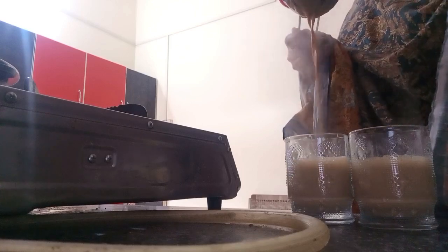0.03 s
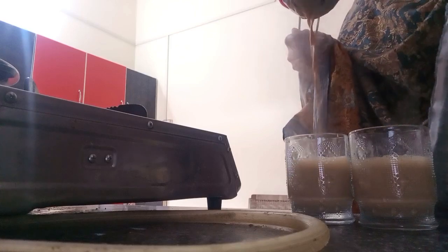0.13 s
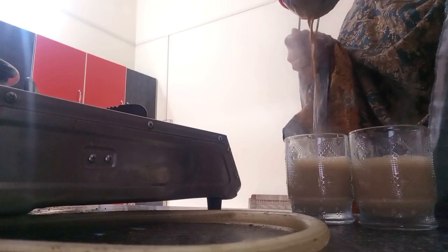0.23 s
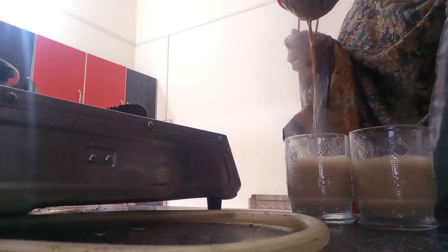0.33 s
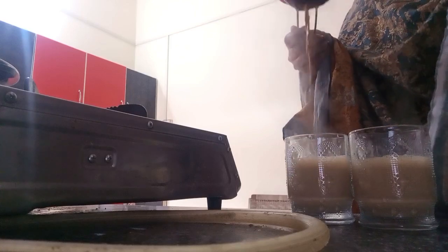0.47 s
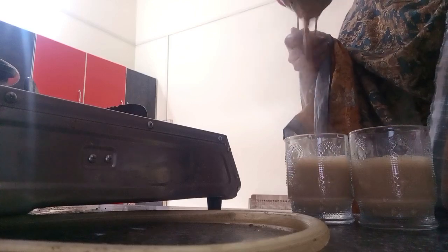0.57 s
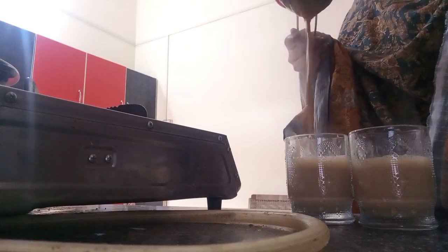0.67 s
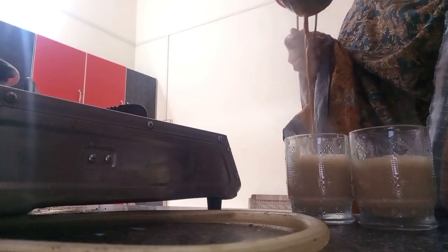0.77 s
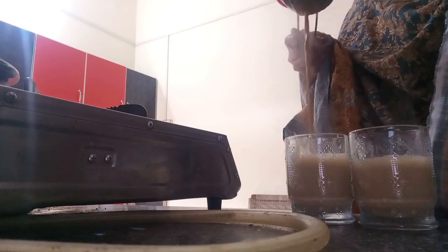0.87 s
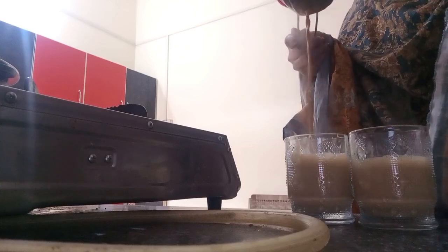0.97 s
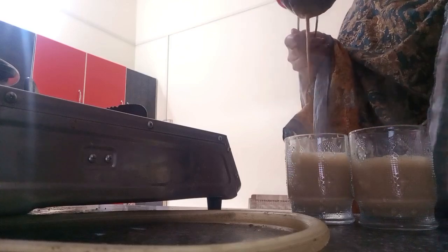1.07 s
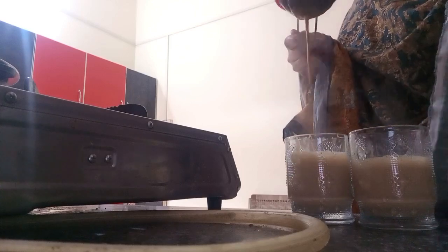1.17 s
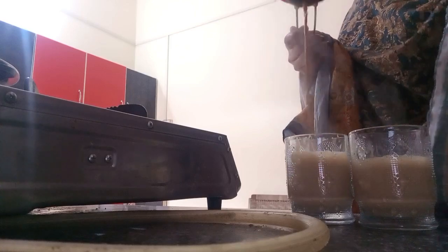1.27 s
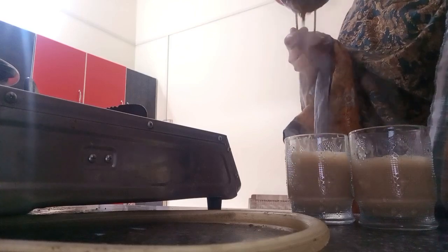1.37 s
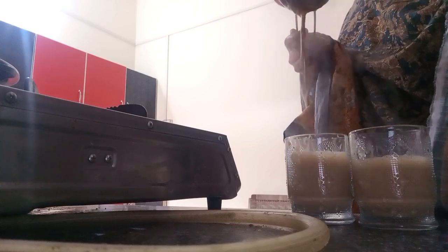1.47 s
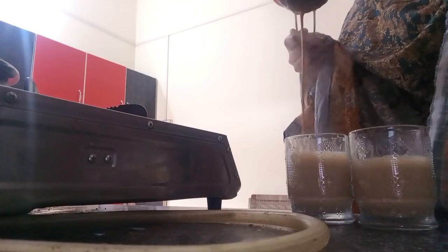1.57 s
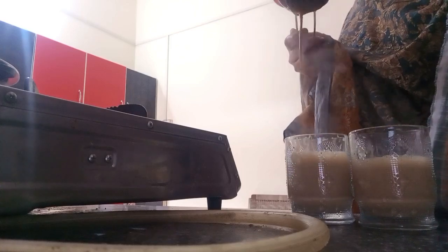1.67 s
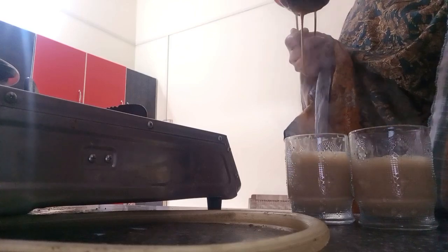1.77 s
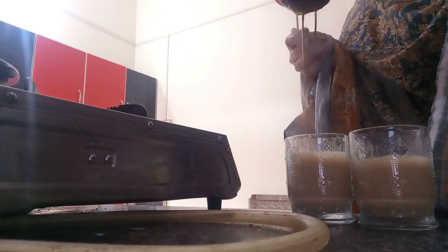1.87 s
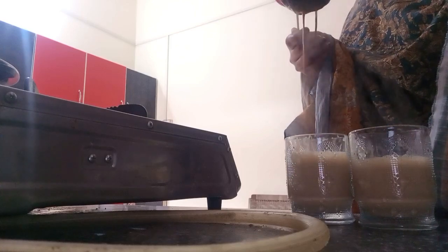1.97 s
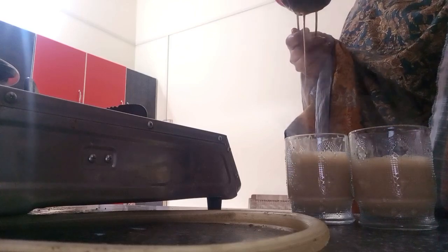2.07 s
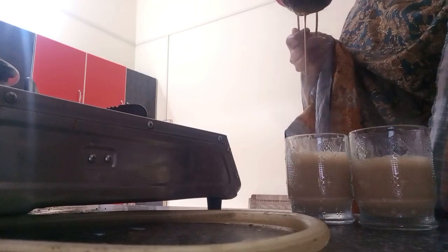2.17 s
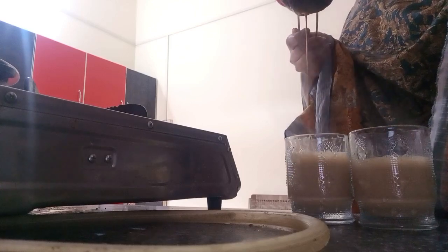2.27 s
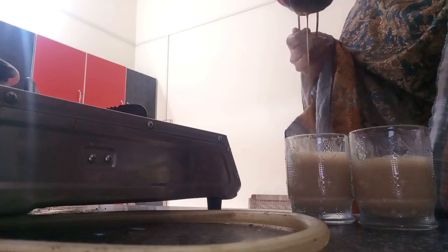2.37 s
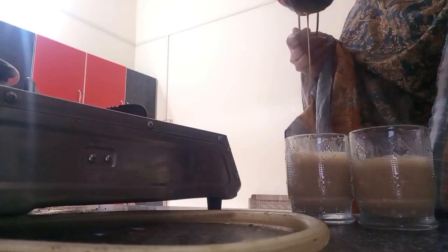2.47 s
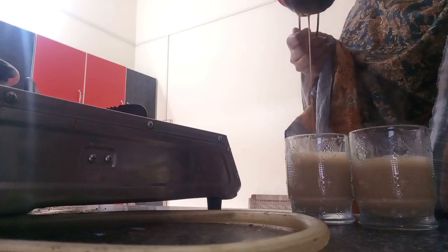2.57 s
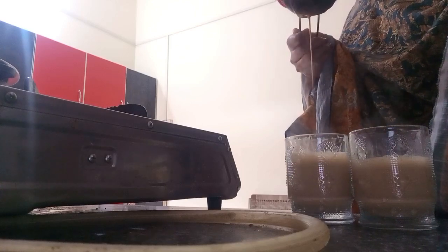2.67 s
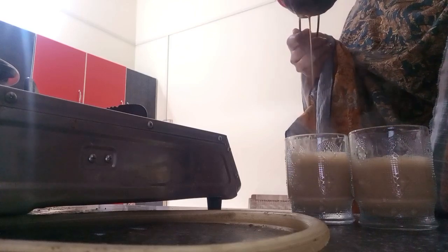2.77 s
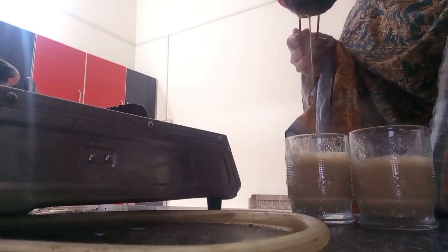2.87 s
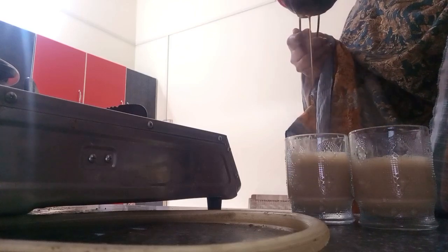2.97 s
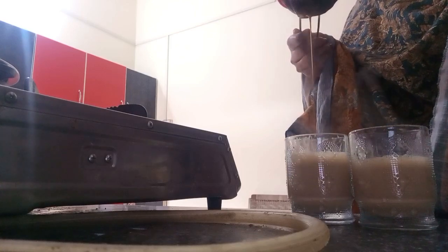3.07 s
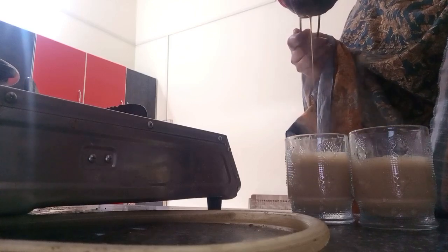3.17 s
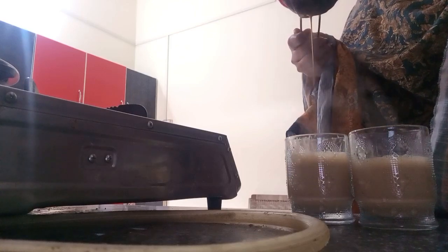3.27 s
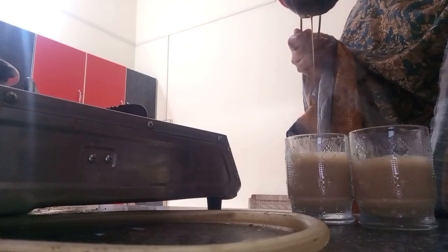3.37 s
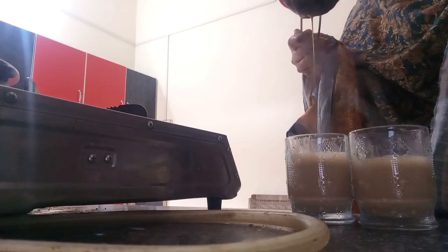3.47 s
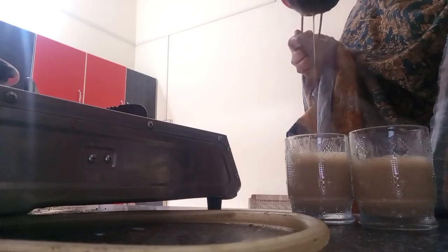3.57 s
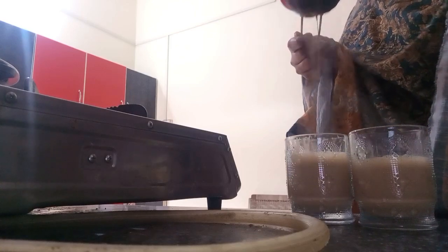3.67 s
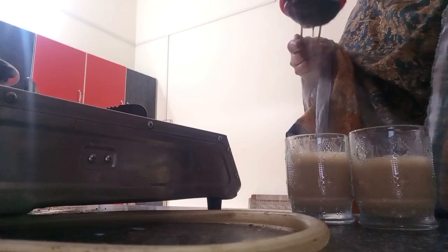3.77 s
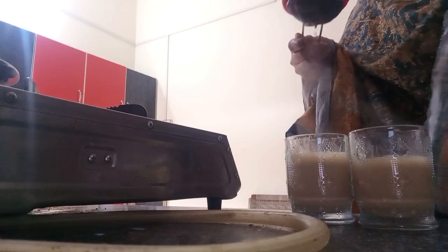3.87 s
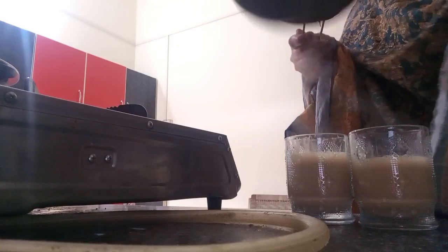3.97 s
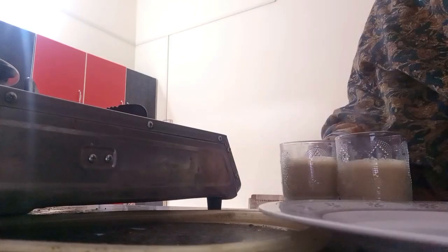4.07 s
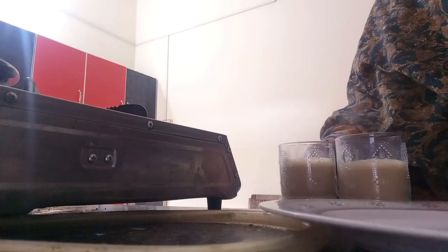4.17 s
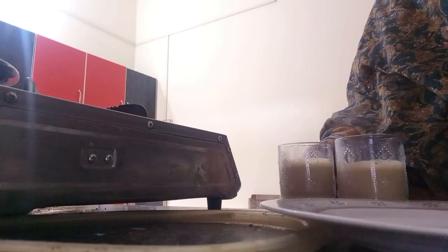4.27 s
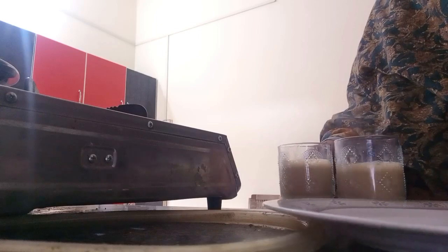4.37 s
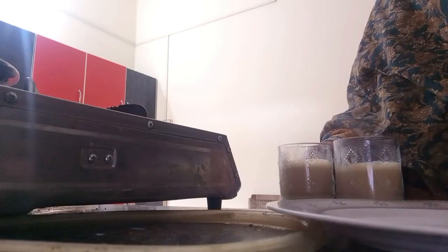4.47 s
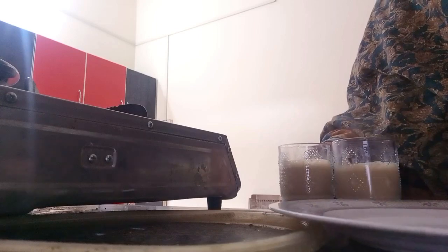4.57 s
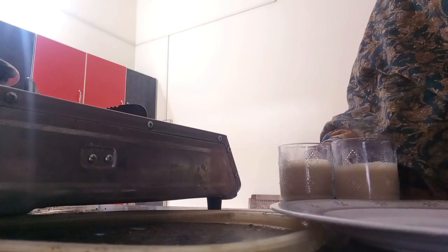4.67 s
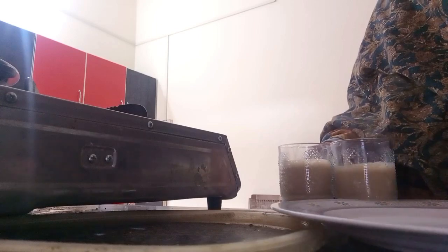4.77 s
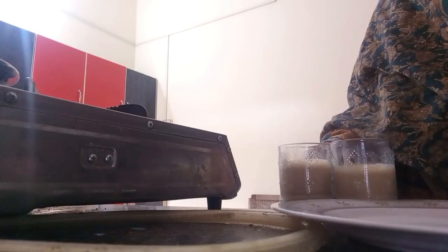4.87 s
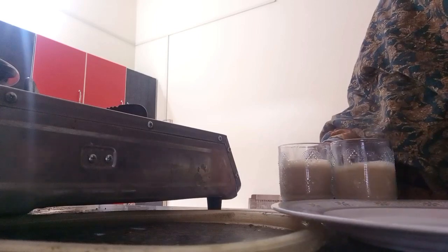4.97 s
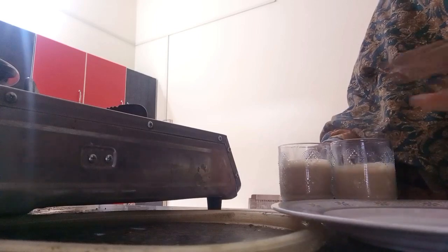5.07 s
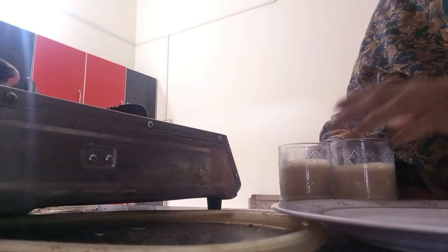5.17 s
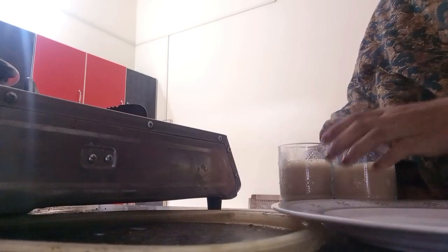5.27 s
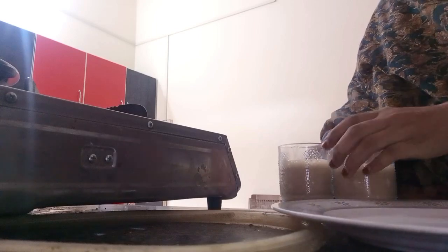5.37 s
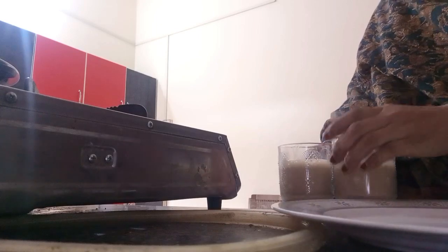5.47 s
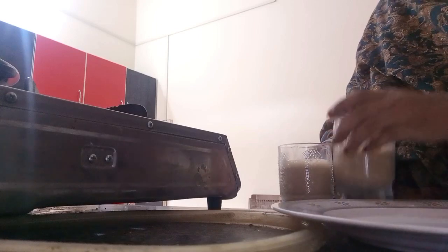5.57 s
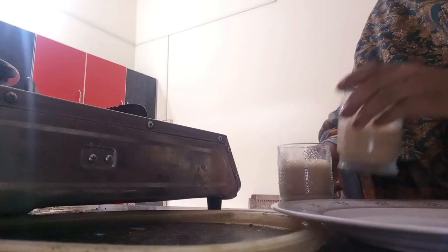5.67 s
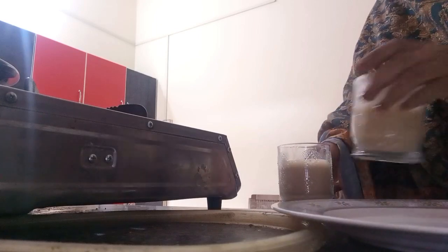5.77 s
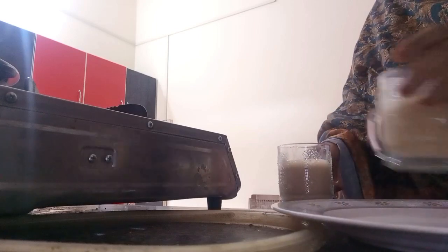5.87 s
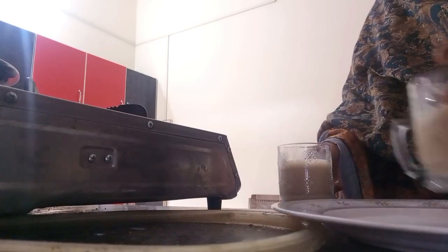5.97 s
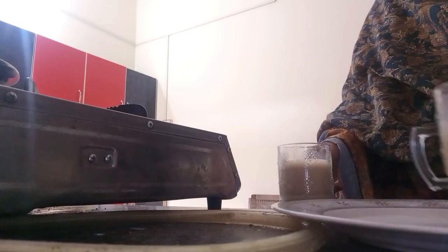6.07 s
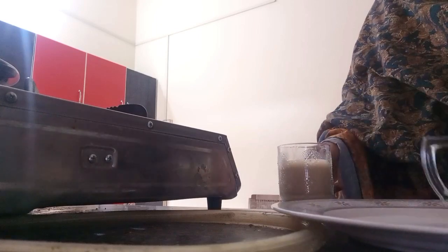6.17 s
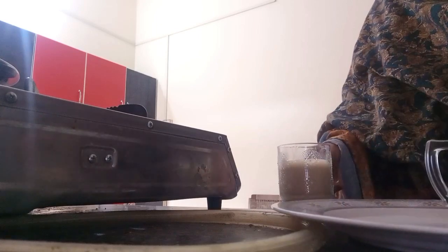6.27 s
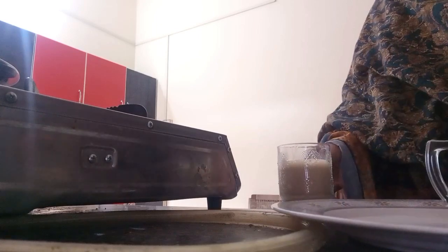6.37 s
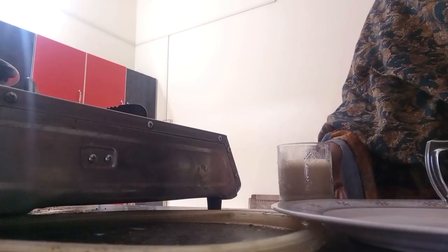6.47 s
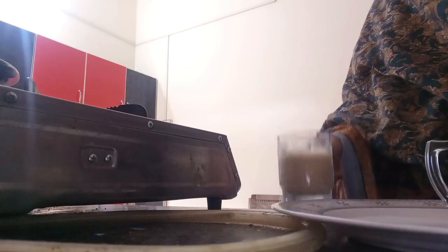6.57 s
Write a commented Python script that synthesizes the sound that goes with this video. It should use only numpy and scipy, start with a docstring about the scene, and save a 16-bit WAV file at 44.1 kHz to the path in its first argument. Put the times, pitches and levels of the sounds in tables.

```python
"""Hot tea trickles through a strainer into a glass tumbler, close to the microphone: rising bubble tones,
puffs of droplet noise, low glugs and a soft bed of gurgle, fizz and slosh. The pan taps the strainer twice.
After a very brief silence a plate slides along the counter as resonant friction noise. Glasses clink, and
one is set down with a sharp knock; these blows are noise bursts with dying tones. Room echo, air, a low
rumble and a thin whine lie around it all."""
import sys
import numpy as np
from scipy import signal
from scipy.fft import rfft, irfft
from scipy.io import wavfile
from scipy.ndimage import uniform_filter1d

SR = 44100
rng = np.random.default_rng(int(sys.argv[2]) if len(sys.argv) > 2 else 0)


def store_wav(level_fs):
    """Save 16-bit WAV to argv[1]."""
    pcm = np.round(np.clip(np.atleast_2d(level_fs), -1, 1) * 32767)
    wavfile.write(sys.argv[1], SR, pcm.T.astype(np.int16))


N = 291501
T = np.arange(N) / SR  # time in seconds

# In all tables, fade time means the time to die away by 60 dB.
# Room air noise. Each row: frequency in Hz, relative level in dB.
AIR_SPECTRUM = [(25, -31.5), (87, -19.5), (180, -15.5), (270, 9), (480, -14), (800, -20), (2100, -16),
                (6300, -25), (8000, -32.5), (16200, -21.5)]
# Low rumble of the house. Each row: time in seconds, level in dB.
RUMBLE_LEVEL = [(0, -68), (2.0, -67.5), (4.0, -68), (5.0, -65.5), (5.3, -70), (5.8, -63.5), (6.61, -64)]
# Swells of the thin whine. Each row: middle in seconds, length in seconds, lift in dB.
WHINE_SWELLS = [(2.294, 0.22, 9.5), (2.973, 0.16, 15), (5.5, 0.43, 11.5)]
# Echo of the tiled room. Each row: frequency in Hz, fade time in seconds.
ROOM_FADE = [(250, 1), (1000, 0.81), (3000, 0.63), (6000, 0.54), (12000, 0.22)]
# Plate sliding on the counter. Each row: time in seconds, speed from 0 to 1.
SLIDE_SPEED = [(4.026, 0.41), (4.2, 0.44), (4.3, 0.61), (4.48, 0.8), (4.77, 0.57), (4.826, 0.57)]
# Plate resonances. Each row: frequency in Hz, width in Hz, lift in dB before it wanders.
PLATE_RESONANCES = [(1130, 84, 19.5), (1797, 68, 24), (2080, 54, 19), (2660, 113, 17.5), (3340, 130, 16),
                    (3860, 25, 17), (4570, 85, 15.5), (4820, 110, 17), (5360, 140, 13), (5720, 64, 22.5),
                    (7120, 270, 23.5), (8600, 160, 24.5), (9900, 150, 17)]
# Dull friction noise. Each row: frequency in Hz, relative level in dB.
DULL_RUB_SPECTRUM = [(100, -18), (270, 3.5), (950, -1), (2600, -11), (5500, -29), (16000, -26)]
# Bright friction noise. Each row: frequency in Hz, relative level in dB.
BRIGHT_RUB_SPECTRUM = [(100, -53), (300, 6.5), (1100, -9), (1500, -13), (2700, -2), (6000, -10),
                       (8000, -29.5), (16000, -26)]
# Small shifts as the plate settles. Each row: middle in seconds, length in seconds, peak level in dB,
# brightness from 0 to 1.
PLATE_NUDGES = [(4.779, 0.034, -56, 1), (4.853, 0.068, -45, 0.15), (4.936, 0.066, -53.5, 0.9),
                (4.975, 0.046, -50, 1), (5.067, 0.37, -66.5, 0.86)]
# The plate meets a glass, then settles. Each row: start in seconds, level in dB, relative ring level in dB.
PLATE_HITS = [(4.827, -23, -15.5), (4.831, -23.5, -18.5), (5.002, -38, -12)]
# Tones of the struck plate. Each row: frequency in Hz, relative level in dB, fade time in seconds.
PLATE_TONES = [(135, -11, 0.19), (540, -15, 0.16), (965, -21.5, 0.11), (2430, -5.5, 0.21),
               (2630, -2, 0.074), (6200, -8, 0.11), (6830, -16, 0.064)]
# Dull bumps on the counter. Each row: start in seconds, level in dB, pitch in Hz, fade time in seconds.
COUNTER_BUMPS = [(4.049, -41.5, 600, 0.072), (4.262, -32, 1096, 0.032), (4.399, -44.5, 458, 0.078),
                 (5.002, -39, 311, 0.097), (5.25, -59.5, 1370, 0.067), (5.406, -49, 457, 0.13),
                 (5.95, -48.5, 260, .12), (6.233, -49.5, 322, 0.17)]
# A tumbler rocks on its base. Each row: start in seconds, level in dB.
TUMBLER_ROCKS = [(5.445, -30.5), (5.464, -31.5)]
# Tones of the tumbler's base. Each row: frequency in Hz, relative level in dB, fade time in seconds.
BASE_TONES = [(380, -5, .2), (629, -2.5, 0.22), (845, -13, .15), (1016, 2.5, 0.11), (1739, -13, .08)]
# Glasses touching. Each row: start in seconds, level in dB, relative ring level in dB.
GLASS_CLINKS = [(5.599, -30, -19), (5.603, -32, -22), (5.618, -33, -22), (5.6635, -12, -18)]
# Tones of a tumbler. Each row: frequency in Hz, relative level in dB, fade time in seconds.
GLASS_TONES = [(921, -9, .28), (1270, -18, .3), (1567, -12, .3), (2379, 0, .36), (2527, -8, .4),
               (6853, -21, .22), (10880, -17, .2)]
# Noise of a blow on glass. Each row: frequency in Hz, relative level in dB.
GLASS_BLOW_SPECTRUM = [(90, -44.5), (200, -2.5), (900, 6), (2300, 3.5), (3300, -9), (8000, -35.5),
                       (16000, -31)]
# A glass is set down hard. Each row: start in seconds, level in dB.
GLASS_KNOCKS = [(6.288, 1)]
# Tones of the knocked counter. Each row: frequency in Hz, relative level in dB, fade time in seconds.
COUNTER_TONES = [(65.6, -35, 0.44), (659, -21.5, 0.62), (930, -16, 0.39), (1217, -15, 0.47),
                 (1493, -15.5, 0.53), (2030, -2.5, 0.066), (2784, 3, 0.019), (3990, 1.5, 0.02),
                 (4920, -1.5, 0.015), (5950, -5, 0.029), (7270, -10.5, 0.029)]
# Noise of the knock. Each row: frequency in Hz, relative level in dB.
KNOCK_SPECTRUM = [(30, -27), (500, -20), (850, -4.5), (1500, -5), (2200, -9.5), (3300, -17.5),
                  (6000, -20.5), (16000, -50)]
# The pan taps the strainer. Each row: start in seconds, level in dB.
PAN_TAPS = [(0.509, -15), (1.324, -13)]
# Tones of the pan. Each row: frequency in Hz, relative level in dB, fade time in seconds.
PAN_TONES = [(95.6, -17.5, 0.43), (871, -6, 0.38), (1281, -7.5, 0.41), (2256, -6.5, 0.16),
             (2676, -10, 0.16), (3550, -9.5, 0.15), (4380, -6.5, 0.13)]
# Noise of a pan tap. Each row: frequency in Hz, relative level in dB.
TAP_SPECTRUM = [(60, -31), (110, -11.5), (450, -3.5), (1300, 2), (3200, 11), (4500, 9.5), (7000, 4),
                (16000, -9.5)]
# Strength of the stream. Each row: time in seconds, strength in dB against full flow.
FLOW_STRENGTH = [(0, 2.5), (.8, -3.5), (1.2, -2), (1.8, -6), (2.2, -10), (2.6, -18.5), (3.3, -14.5),
                 (3.42, -26.5), (3.55, -20), (3.82, -26.5), (3.88, -42), (4.02, -22)]
# Larger bubbles caught by the stream. Each row: start in seconds, relative level in dB, basic pitch in Hz.
BUBBLES = [(0.035, -38, 1190), (0.064, -34.5, 1034), (0.112, -40, 1200), (0.134, -35, 1090),
           (0.279, -32.5, 1320), (0.303, -36.5, 1220), (0.372, -35.5, 976), (0.484, -29, 1280),
           (0.685, -29, 1020), (0.789, -39, 1220), (0.867, -37.5, 1120), (.912, -41.5, 1055),
           (1.001, -34, 1130), (1.06, -39.5, 1300), (1.203, -28, 1195), (1.23, -38, 1520),
           (1.296, -37.5, 990), (1.318, -32, 1250), (1.509, -35, 1080), (1.539, -34.5, 1310),
           (1.681, -24, 1093), (1.874, -37.5, 824), (1.977, -37.5, 960), (2.052, -42, 1280),
           (2.075, -33.5, 1035), (2.104, -39.5, 1720), (2.125, -32, 1070), (2.202, -35.5, 1330),
           (2.227, -37, 1230), (2.304, -26, 1240), (2.328, -33.5, 1680), (2.506, -41.5, 1240),
           (2.581, -44, 1360), (2.69, -42, 1040), (2.723, -43, 1284), (2.76, -39, 1305), (2.939, -43, 1170),
           (2.993, -39.5, 1310), (3.088, -50, 1280), (3.112, -33.5, 1694), (3.19, -46.5, 943),
           (3.278, -39.5, 1690), (3.317, -41, 1250), (3.351, -48.5, 1620), (3.496, -51, 1730),
           (3.573, -55, 1900), (3.741, -50.5, 900), (3.76, -53, 950), (3.8, -55.5, 1720), (3.891, -57, 895)]
# Larger droplets splashing on the surface. Each row: start in seconds, relative level in dB, centre in Hz.
SPLASHES = [(0.018, -37.5, 8850), (.079, -38, 9500), (.219, -41, 10500), (.377, -37, 9000),
            (.332, -34.5, 3700), (0.485, -38, 3280), (0.684, -31.5, 3440), (0.789, -38, 3350),
            (.833, -35, 9400), (1.538, -28.5, 1920), (0.896, -33, 5600), (1.11, -36.5, 4000),
            (1.193, -39.5, 6350), (1.517, -25, 8950), (1.682, -35.5, 7950), (1.747, -40, 3250),
            (1.781, -42.5, 3800), (1.927, -45, 4250), (1.965, -38, 8500), (1.995, -35.5, 2300),
            (2.009, -44, 9000), (2.504, -46, 3520), (2.625, -46, 3500), (2.842, -43.5, 3100),
            (2.990, -44, 3050), (3.19, -43.5, 2750), (3.242, -45, 7900), (3.35, -43.5, 3120),
            (3.65, -49, 2800), (3.693, -45, 2600), (3.799, -52.5, 3200)]
# Low glugs deep in the glass. Each row: start in seconds, level in dB, starting pitch in Hz,
# fade time in seconds.
GLUGS = [(0.833, -28, 297, 0.024), (0.974, -31, 260, 0.048), (1.001, -35.5, 337.7, 0.11),
         (1.098, -45, 293, 0.1), (1.161, -40, 351, 0.077), (3.265, -44.5, 293, 0.095),
         (3.479, -48, 264, 0.17)]
# Resonances of the air above the tea. Each row: frequency in Hz, width in Hz, gain in dB.
AIR_COLUMN = [(596, 920, 0.5), (973, 87, 2), (1273, 84, 7.5), (1500, 120, 9.5), (1960, 430, 12.5)]
# Upper resonances of the same air. Each row: frequency in Hz, width in Hz, lift in dB.
UPPER_AIR_COLUMN = [(3290, 90, -1), (3700, 170, -0.5)]
# Fizz of unseen droplets. Each row: frequency in Hz, relative level in dB.
FIZZ_SPECTRUM = [(1500, 1), (2500, 21), (3300, 18.5), (4200, 13.5), (6000, 15.5), (10000, 13.5), (16000, 5)]
# Colour of the microphone. Each row: frequency in Hz, gain in dB.
MIC_COLOUR = [(20, 5), (60, 1.5), (7000, -1), (9000, -9), (11000, -12.5), (13200, -23.5), (15300, -10)]

AIR_DB, WHINE_DB, WHINE_FADE_DB_PER_S = -64.5, -68, -2.5
WHINE_FROM_S, WHINE_RISE_S = 1.3, 0.25
RUB_FROM_S, RUB_TO_S = 4, 5.3  # the plate can rub only in this span
SLIDE_DB, SLOW_DB = -45, -7  # level at full speed, change towards rest
BRIGHTNESS_PER_SPEED = 1.34
RUB_WANDER_DB, RUB_WANDER_S = 4, .07
RUB_CATCH_DB, RUB_CATCH_S = 2, .012
TREBLE_SLOW_DB_PER_KHZ = -2.5
BUBBLE_START = 0.937  # a bubble starts at this share of its basic pitch
BUBBLE_RISE_S, BUBBLE_FADE_S, BUBBLE_GLIDE = .001, .02, 18.0  # fade and glide vary per bubble
SLAP_DB = -5  # against the bubble
GLUG_RISE_S = 0.0032
# bed layers: level at full flow in dB, then dB of change per dB of flow
GURGLE_DB, GURGLE_FOLLOW = -52, .9
FIZZ_DB, FIZZ_FOLLOW = -56, 1
SLOSH_DB, SLOSH_FOLLOW = -57, 1.23
SILENCE_FROM_S, SILENCE_TO_S = 4.018, 4.026
DIP_FROM_S, DIP_TO_S, DIP_DB = 5.17, 5.235, -6
CEILING = .75  # soft overload, full scale is 1
LOW_EDGE_HZ, HIGH_EDGE_HZ = 58, 16000


def gain_of(db):
    """Turns decibels into a multiplier."""
    return 10 ** (np.asarray(db) / 20)


def evened(x):
    """Scales a sound to an average (rms) level of 1."""
    return x / np.sqrt(np.mean(x ** 2) + 1e-20)


def read(points, hz):
    """Reads a frequency table between its rows, on a logarithmic pitch scale."""
    f, value = np.transpose(points)
    return np.interp(np.log(hz + 1), np.log(f + 1), value)


def follow(rows):
    """Joins the rows of a time table into a curve."""
    s, value = np.transpose(rows)
    return np.interp(T, s, value)


def add(mix, s, sound):
    """Adds a sound to the mix from time s, cut off at the end."""
    part = mix[round(s * SR):][:len(sound)]
    part += sound[:len(part)]


def swell(middle, length):
    """A smooth hump from 0 to 1 and back."""
    return np.cos(np.pi * np.clip((T - middle) / length, -.5, .5)) ** 2


def wander(step_s, t):
    """A random curve about zero, with a new target every step."""
    knots = np.arange(t[0], t[-1] + step_s, step_s)
    return np.interp(t, knots, rng.standard_normal(len(knots)))


def resonate(x, hz, width, count=1):
    """Favours one pitch, as a resonance with a gain of about 1; steeper when repeated."""
    pole = np.exp((2j * np.pi * hz - np.pi * width) / SR)
    for _ in range(count):
        x = 2 * signal.lfilter([1 - abs(pole)], [1, -pole], x).real
    return x


def resonance_sum(x, resonances):
    """Adds up several resonances side by side."""
    return sum(gain_of(db) * resonate(x, hz, width) for hz, width, db in resonances)


def coloured(x, spectrum):
    """Shapes a noise to a spectrum, rms 1."""
    gain = gain_of(read(spectrum, np.fft.rfftfreq(len(x), 1 / SR)))
    return evened(irfft(rfft(x) * gain, len(x)))


def patter(per_s, spread_db):
    """A train of clicks at random times, of random sign and uneven size, rms 1."""
    place, size, sign = rng.random((3, round(per_s * N / SR)))
    clicks = np.zeros(N)
    click_db = spread_db * np.minimum(-np.log(size), 4)
    clicks[(place * N).astype(int)] = np.sign(sign - .5) * gain_of(click_db)
    return evened(clicks)


def ring(hz, fade_s, rise_s, glide=0., length=4000):
    """A dying sine with a soft start; glide is its pitch rise per second, as a share of hz."""
    t = np.arange(length) / SR
    wave = np.sin(2 * np.pi * hz * (t + glide * t ** 2 / 2))
    return wave * gain_of(-60 * t / fade_s) * (1 - np.exp(-t / rise_s))


def puff(hz, width, fade_s):
    """A short dying burst of noise around one pitch; peak 1."""
    fade = gain_of(-60 * np.arange(4000) / SR / fade_s)
    burst = resonate(rng.standard_normal(4000) * fade, hz, width, count=2)
    return burst / np.abs(burst).max()


def blow(spectrum, tones, contact_s, ring_db, rattle_db=-60, rattle_fade_s=.3):
    """Contact noise, a rough rattle after it, and the struck object's dying tones; peak 1."""
    t = np.arange(SR // 2) / SR
    contact = np.exp(-(t / contact_s) ** 2) * (1 - np.exp(-t / 0.00024))
    jolts = gain_of(2.5 * evened(resonate(rng.standard_normal(len(t)), 0, 120)))
    rattle = jolts * gain_of(rattle_db - 60 * t / rattle_fade_s) * (1 - np.exp(-t / 0.02))
    burst = coloured(rng.standard_normal(len(t)), spectrum) * (contact + rattle)
    ringing = np.zeros(len(t))
    for k, (hz, db, fade_s) in enumerate(tones):
        sense = (-1) ** k  # neighbouring tones start in opposite directions
        ringing += sense * gain_of(db) * ring(hz, fade_s, 0.00035, length=len(t))
    ringing *= 1 + 2.65 * contact  # stronger during contact
    sound = burst / np.abs(burst).max() + gain_of(ring_db) * ringing
    return sound / np.abs(sound).max()


def room_air():
    """Broad noise whose low part comes in lumps."""
    air = rng.standard_normal(N)
    lumps = gain_of(5. * wander(.06, T))
    air = air + (lumps - 1) * resonate(air, 280, 200)
    return gain_of(AIR_DB) * coloured(air, AIR_SPECTRUM)


def house_rumble():
    """Noise passed through a low resonance, with a slowly changing level."""
    rumble = evened(resonate(rng.standard_normal(N), 115.2, 77, count=2))
    return gain_of(follow(RUMBLE_LEVEL)) * rumble


def whine():
    """A narrow, fuzzy band of noise sets in, fades steadily and now and then swells."""
    thin = evened(resonate(rng.standard_normal(N), 6098, 130, count=2))
    onset = np.clip((T - WHINE_FROM_S) / WHINE_RISE_S, 0, 1)
    lift_db = sum(db * swell(s, length) for s, length, db in WHINE_SWELLS)
    return gain_of(WHINE_DB + WHINE_FADE_DB_PER_S * T + lift_db) * thin * onset


def room(x):
    """A dense random echo tail, each pitch band dying at its own speed."""
    hz, t, bands = signal.stft(rng.standard_normal(SR), SR, nperseg=256)
    fade = gain_of(-60 * t / read(ROOM_FADE, hz)[:, None])
    tail = signal.istft(bands * fade, SR, nperseg=256)[1][:SR]
    tail = tail * (1 - np.exp(-(np.arange(SR) / SR / 0.0017) ** 2))  # the walls answer late
    return signal.fftconvolve(x, tail / np.linalg.norm(tail))[:N]


def plate_slide():
    """Uneven friction noise, louder and brighter at speed, with plate resonances that come and go."""
    part = slice(round(RUB_FROM_S * SR), round(RUB_TO_S * SR))
    t, speed = T[part], follow(SLIDE_SPEED)
    grit = (rng.standard_normal(N) + 0.86 * patter(980.0, spread_db=-0.5))[part]
    grit = grit * gain_of(RUB_CATCH_DB * wander(RUB_CATCH_S, t))
    ringing = grit.copy()
    for hz, width, db in PLATE_RESONANCES:
        treble_loss_db = TREBLE_SLOW_DB_PER_KHZ * hz / 1000 * (1 - speed[part])
        lift_db = db + RUB_WANDER_DB * wander(RUB_WANDER_S, t) + treble_loss_db
        ringing += gain_of(lift_db) * resonate(grit, hz, width)
    dull, sharp = np.zeros((2, N))
    dull[part] = coloured(grit + gain_of(12.0) * resonate(grit, 1010, 110), DULL_RUB_SPECTRUM)
    sharp[part] = coloured(ringing, BRIGHT_RUB_SPECTRUM)

    def rub(brightness):
        """Blends dull and sharp friction."""
        return dull + np.clip(brightness, 0, 1) * (sharp - dull)

    moving = (T > SLIDE_SPEED[0][0]) & (T < SLIDE_SPEED[-1][0])
    out = moving * gain_of(SLIDE_DB + SLOW_DB * (1 - speed)) * rub(BRIGHTNESS_PER_SPEED * speed)
    for s, length, db, brightness in PLATE_NUDGES:
        out += gain_of(db) * swell(s, length) * rub(brightness)
    return out


def plate_hits():
    """Contact noise and plate tones as the plate meets a glass and settles."""
    out = np.zeros(N)
    for s, db, ring_db in PLATE_HITS:
        add(out, s, gain_of(db) * blow(GLASS_BLOW_SPECTRUM, PLATE_TONES, 0.013, ring_db))
    return out


def counter_bumps():
    """Each bump is a dying tone with a puff of low noise."""
    out = np.zeros(N)
    for s, db, hz, fade_s in COUNTER_BUMPS:
        add(out, s, gain_of(db) * (ring(hz, fade_s, 0.00038) + 1.2 * puff(616, 820, fade_s)))
    return out


def tumbler_rocks():
    """The tumbler's base strikes the counter and rings."""
    out = np.zeros(N)
    for s, db in TUMBLER_ROCKS:
        add(out, s, gain_of(db) * blow(GLASS_BLOW_SPECTRUM, BASE_TONES, 0.0084, ring_db=-7.0))
    return out


def glass_clinks():
    """Tumblers clink close to the microphone: contact noise and glass tones."""
    out = np.zeros(N)
    for s, db, ring_db in GLASS_CLINKS:
        add(out, s, gain_of(db) * blow(GLASS_BLOW_SPECTRUM, GLASS_TONES, 0.0094, ring_db))
    return out


def glass_knock():
    """A glass set down hard sets off counter tones and a rattle."""
    out = np.zeros(N)
    for s, db in GLASS_KNOCKS:
        knock = blow(KNOCK_SPECTRUM, COUNTER_TONES, 0.0086, ring_db=-12.5, rattle_db=-7., rattle_fade_s=.5)
        add(out, s, gain_of(db) * knock)
    return out


def pan_taps():
    """The pan strikes the strainer, with metal tones and a rattle."""
    out = np.zeros(N)
    for s, db in PAN_TAPS:
        tap = blow(TAP_SPECTRUM, PAN_TONES, 0.007, ring_db=-22.5, rattle_db=-16.0, rattle_fade_s=0.42)
        add(out, s, gain_of(db) * tap)
    return out


def spray(x):
    """The upper resonances of the air above the tea lift the droplet sounds."""
    return x + resonance_sum(x, UPPER_AIR_COLUMN)


def gurgle():
    """Small bubbles of many sizes come in clusters and excite the air above the tea; rms 1."""
    clusters = gain_of(4.5 * evened(resonate(rng.standard_normal(N), 0, 25)))
    small = np.zeros(N)
    for hz in np.geomspace(450, 1650, num=9):
        bubble = ring(hz, .014, .0005, glide=14.)
        small += signal.oaconvolve(patter(35., spread_db=2.), bubble)[:N]
    return evened(resonance_sum(clusters * small, AIR_COLUMN))


def fizz():
    """Unseen droplets: short puffs of many sizes over a soft hiss; rms 1."""
    plips = np.zeros(N)
    for hz in np.geomspace(2200, 14000, num=9):
        droplets = signal.oaconvolve(patter(22.0, spread_db=3.0), puff(hz, 0.32 * hz, 0.015))[:N]
        plips += evened(droplets)
    return coloured(rng.standard_normal(N) + 2.0 * evened(spray(plips)), FIZZ_SPECTRUM)


def slosh():
    """Random pushes through a low resonance; rms 1."""
    return evened(resonate(patter(120.0, spread_db=4.5), 308.0, 220, count=2))


def stream_bed():
    """The finer sounds of the stream follow its strength and stop at the silence."""
    flow_db = follow(FLOW_STRENGTH)
    bed = gain_of(GURGLE_DB + GURGLE_FOLLOW * flow_db) * gurgle()
    bed += gain_of(FIZZ_DB + FIZZ_FOLLOW * flow_db) * fizz()
    bed += gain_of(SLOSH_DB + SLOSH_FOLLOW * flow_db) * slosh()
    return bed * (T < SILENCE_FROM_S)


def glugs():
    """Low dying tones that climb in pitch."""
    out = np.zeros(N)
    for s, db, hz, fade_s in GLUGS:
        add(out, s, gain_of(db) * ring(hz, fade_s, GLUG_RISE_S, glide=2.3))
    return out


def splashes():
    """Larger droplets make puffs of noise, coloured by the air above the tea."""
    out = np.zeros(N)
    for s, db, hz in SPLASHES:
        add(out, s, gain_of(db) * puff(hz, 0.42 * hz, .05))
    return 0.61 * spray(out)


def bubbles():
    """Bubble tones climb and excite the air above the tea; the stream slaps the surface at each one."""
    tones, slaps = np.zeros((2, N))
    for s, db, hz in BUBBLES:
        vary = rng.uniform(.6, 1.4)
        tone = ring(BUBBLE_START * hz, BUBBLE_FADE_S * vary, BUBBLE_RISE_S, glide=BUBBLE_GLIDE * vary)
        add(tones, s, gain_of(db) * tone)
        add(slaps, s, gain_of(db + SLAP_DB) * puff(1.1 * hz, .9 * hz, .035))
    # a nearby wall returns each tone after 521 samples, again and again more faintly
    tones = signal.lfilter([1], np.r_[1, np.zeros(520), -.15], tones)
    return 0.086 * tones + 0.91 * resonance_sum(tones, AIR_COLUMN) + slaps


def pouring():
    """Tea falling into the glass: bubbles, splashes, glugs and the finer stream."""
    return bubbles() + splashes() + glugs() + stream_bed()


def scene():
    """Mixes the sources with the room's echo; the slide and background get no echo."""
    background = room_air() + house_rumble() + whine()
    struck = plate_hits() + counter_bumps() + tumbler_rocks() + glass_knock() + pan_taps()
    clinks = glass_clinks()
    liquid = pouring()
    walls = room(gain_of(-8.0) * liquid + gain_of(-8.5) * struck + gain_of(-9) * clinks)
    return (background + walls + plate_slide() + struck + clinks + liquid)[None]


def record(dry):
    """The brief silence and level dip, soft overload, the microphone's colour and the band limits."""
    fade_out, fade_in = (SILENCE_FROM_S - T) / 0.0012, (T - SILENCE_TO_S) / 0.0019
    passed = dry * np.clip(np.maximum(fade_out, fade_in), 0, 1)
    in_dip = 1. * ((T > DIP_FROM_S) & (T < DIP_TO_S))
    passed = passed * gain_of(DIP_DB * uniform_filter1d(in_dip, size=400))  # softened edges
    passed = CEILING * np.tanh(passed / CEILING)
    no_deep_bass = signal.butter(4, LOW_EDGE_HZ, "high", fs=SR, output="sos")
    passed = signal.sosfilt(no_deep_bass, passed)
    hz = np.linspace(0, SR / 2, num=1025)
    microphone = signal.firwin2(2047, hz, gain_of(read(MIC_COLOUR, hz)), fs=SR)
    heard = signal.oaconvolve(passed, microphone[None], "same")
    treble_limit = signal.firwin(511, HIGH_EDGE_HZ, window=("kaiser", 9), fs=SR)
    return signal.oaconvolve(heard, treble_limit[None], "same")


dry = scene()
out = record(dry)
store_wav(out)
```